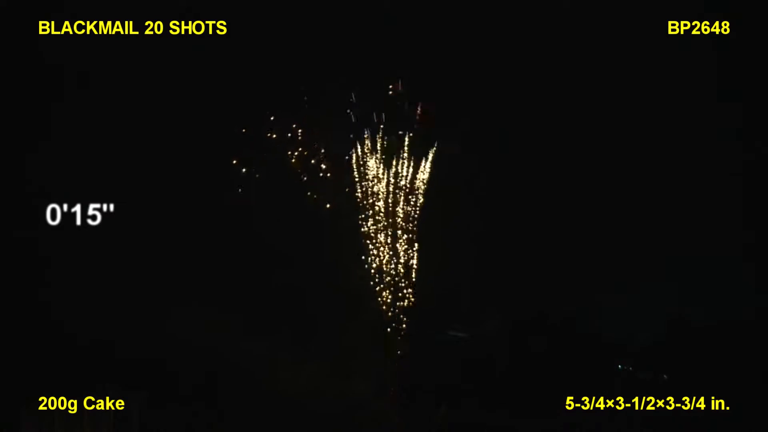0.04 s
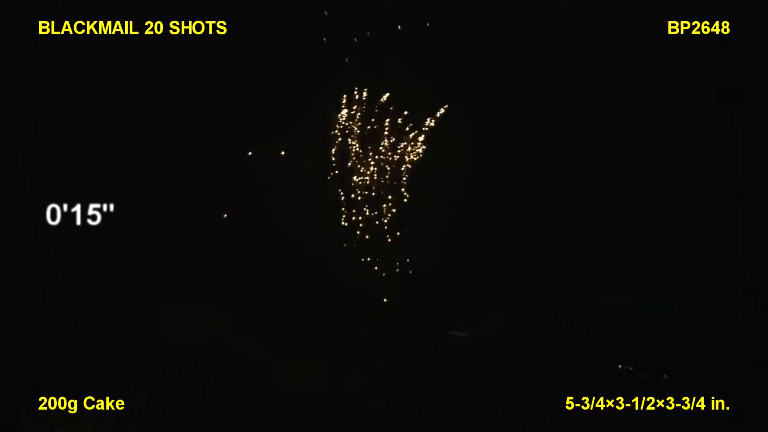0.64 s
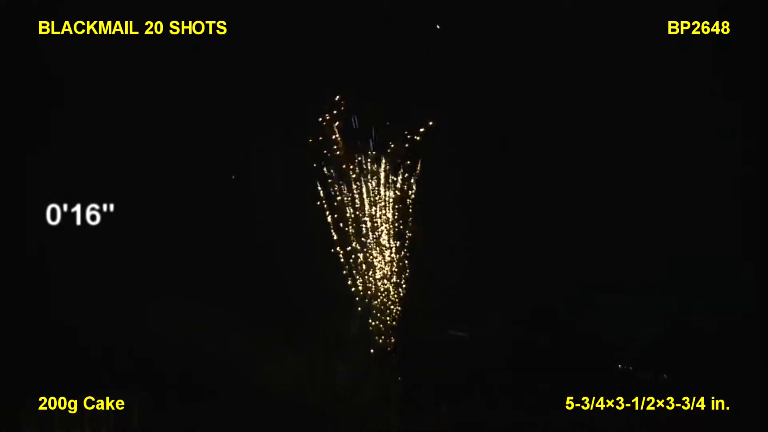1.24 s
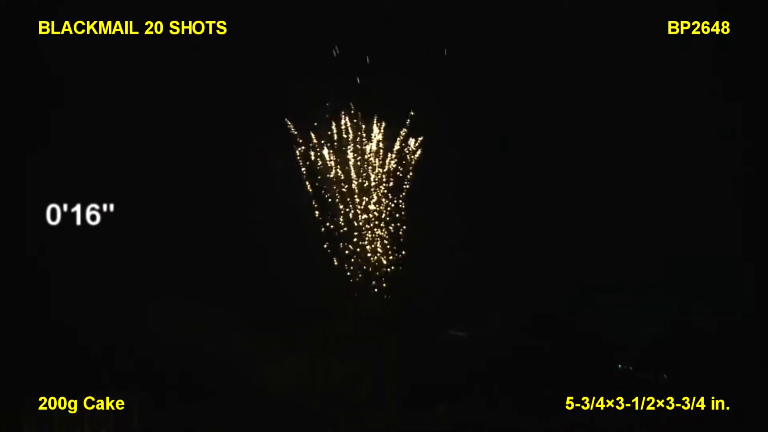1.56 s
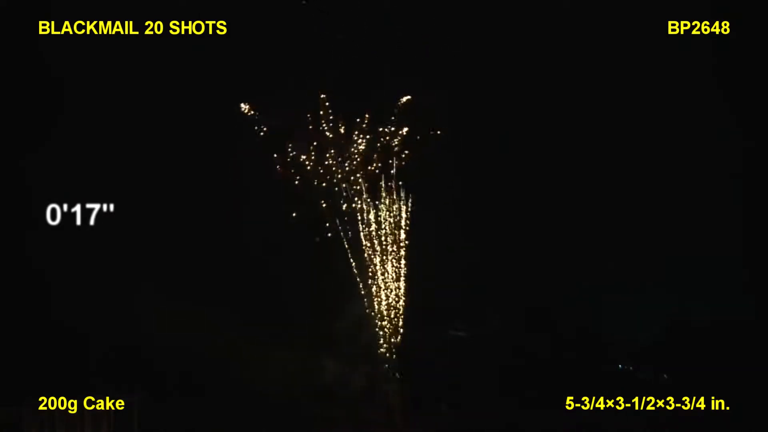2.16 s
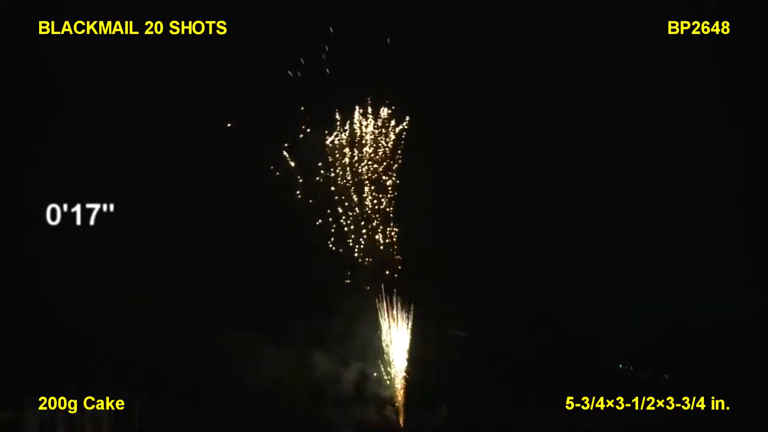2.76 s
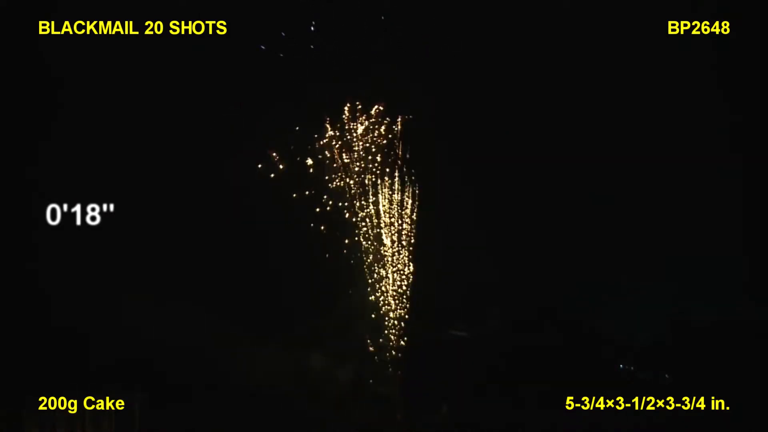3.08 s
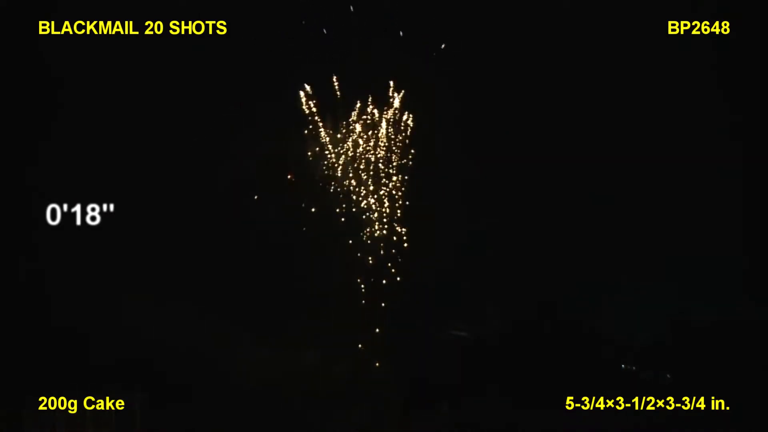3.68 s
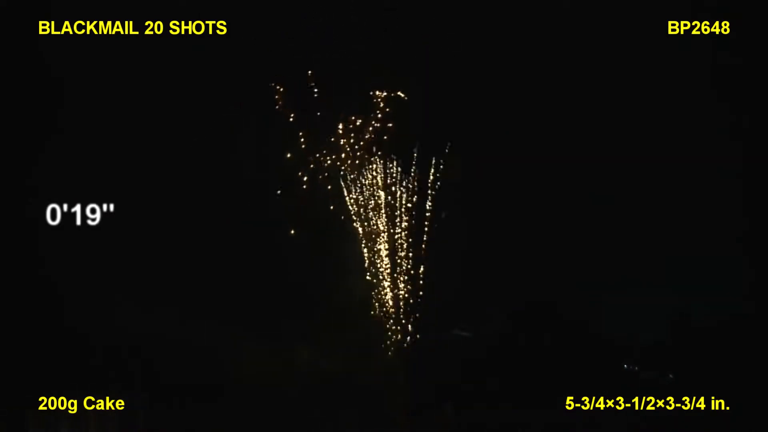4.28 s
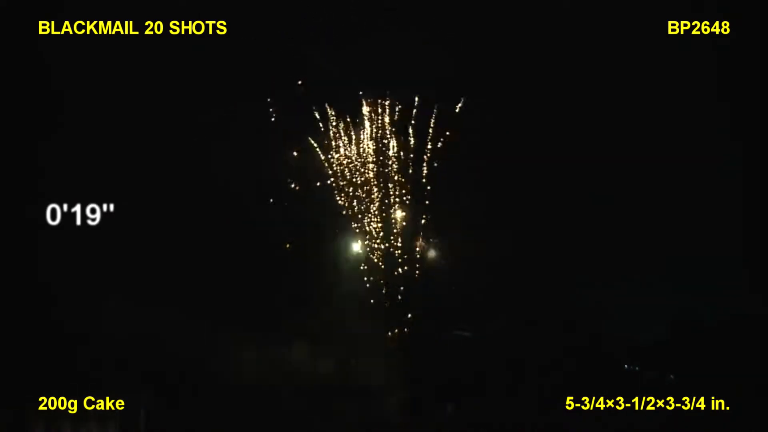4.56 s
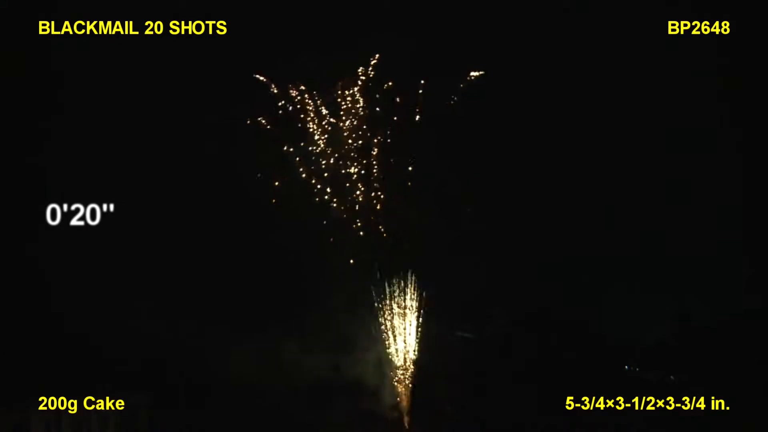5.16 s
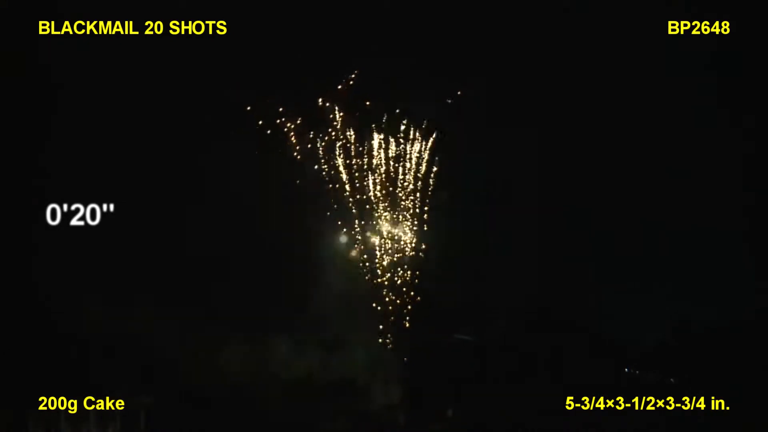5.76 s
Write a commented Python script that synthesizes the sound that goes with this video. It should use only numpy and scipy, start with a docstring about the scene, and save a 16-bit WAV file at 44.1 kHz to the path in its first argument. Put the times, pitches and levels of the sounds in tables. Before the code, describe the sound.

Echoing firework launches send up sputtering, fading hisses in an open field at night, and stars crackle sharply overhead late on.

```python
"""Burning stars rush upward and slow over singing insects: a firework cake in an open field at night.
About once a second a lift charge throws a new fan, with a thump and a spit of gas that come back as
fixed echoes and scatter from the trees. Late in the scene, stars crackle overhead.
Two microphones stand far apart: the fireworks reach the left one some 30 ms later, with other echoes
and another colour."""
import sys
import numpy as np
from scipy import signal
from scipy.fft import rfft, irfft
from scipy.io import wavfile

SR = 44100
rng = np.random.default_rng(int(sys.argv[2]) if len(sys.argv) > 2 else 0)


def dump(signal):
    """Clip the signal to [-1, 1] and save it as 16-bit WAV at the path in sys.argv[1]."""
    limited = np.clip(np.atleast_2d(signal).T, -1, 1)
    pcm = np.round(limited * 32767).astype(np.int16)
    wavfile.write(sys.argv[1], SR, pcm)


N = 265482
LEFT_LAG_S, SKY_LAG_S = .0305, .0295   # the left microphone's delay: for the cake, for the crackle


def from_db(db):
    """Decibels to gain."""
    return 10 ** (np.asarray(db) / 20)


def rms_one(x):
    """Scales x to an rms of 1."""
    return x / np.sqrt(np.mean(x ** 2) + 1e-20)


def add(out, x, start_s):
    """Mixes x into out from start_s on."""
    at = int(round(start_s * SR))
    first, last = max(at, 0), min(at + len(x), len(out))
    if last > first:
        out[first:last] += x[first - at:last - at]


def butter(x, hz, kind, order=2):
    """A plain low-, high- or band-pass."""
    return signal.sosfilt(signal.butter(order, hz, kind, fs=SR, output="sos"), x)


def resonance(x, hz, width_hz):
    """Two-pole resonance, gain 1 at its peak."""
    r = np.exp(-np.pi * width_hz / SR)
    feedback = [1, -2 * r * np.cos(2 * np.pi * hz / SR), r * r]
    return signal.lfilter(np.array([1, 0, -1]) * (1 - r * r) / 2, feedback, x)


def narrow_band(x, hz, width_hz):
    """Two resonances in series give noise a pitch; rms 1."""
    return rms_one(resonance(resonance(x, hz, width_hz), hz, width_hz))


def bell(x, hz, db, width_octaves):
    """Bell EQ: lifts or hollows out one band."""
    a, w = from_db(db / 2), 2 * np.pi * hz / SR
    k = np.sin(w) * np.sinh(np.log(2) / 2 * width_octaves)
    middle = -2 * np.cos(w)
    return signal.lfilter([1 + k * a, middle, 1 - k * a], [1 + k / a, middle, 1 - k / a], x)


def impulse(colour, size=2048):
    """The tightest causal click that has this EQ curve."""
    hz, db = np.transpose(colour)
    grid = np.maximum(np.fft.rfftfreq(size, 1 / SR), 1)
    gain = from_db(np.interp(np.log(grid), np.log(hz), db))
    cepstrum = irfft(np.log(gain))
    cepstrum[1:size // 2] *= 2
    cepstrum[size // 2 + 1:] = 0
    return irfft(np.exp(rfft(cepstrum)))


def coloured(x, colour):
    """Plays x through an EQ curve."""
    return signal.fftconvolve(x, impulse(colour))[:len(x)]


def hump(t, peak, width):
    """A bell-shaped envelope, peak 1."""
    return np.exp(-((t - peak) / width) ** 2 / 2)


def bloom(t, peak_s, octaves):
    """A hump on a logarithmic time axis: quick attack, long tail."""
    return hump(np.log2(np.maximum(t, 1 / SR) / peak_s), 0, octaves)


def ticks(t, per_s, spread_db):
    """Clicks at random moments, many weak and a few strong; rms 1."""
    signs = rng.choice([-1, 1], len(t))
    sizes = from_db(spread_db * np.minimum(rng.exponential(1, len(t)), 3))
    return rms_one((rng.random(len(t)) < per_s / SR) * signs * sizes)


# EQ of the tiny snaps as sparks break off a star: freq_hz, level_db
SPARK_EQ = [(300, -21), (1100, -5.5), (2400, 1.5), (3600, 5.5), (5000, -15.5), (14000, -31)]
def rush(t, stars=8, start_hz=3367, sag_hz_per_s=1900, spread_octaves=.55, sputter_db=4, tumble_db=4):
    """Each burning star hisses in a band that sinks as it slows; it sputters, tumbles and sheds sparks."""
    hisses = 0
    for place in np.linspace(-1, 1, stars):
        detune = 2 ** (spread_octaves * place + .06 * rng.standard_normal())
        pitch_hz = (start_hz - sag_hz_per_s * t) * detune
        white = rng.standard_normal((3, len(t)))
        hiss = butter(white[0] + 1j * white[1], 150, "low") * np.exp(2j * np.pi * np.cumsum(pitch_hz) / SR)
        tumble_hz = 42 * 2 ** rng.uniform(-.512, .488)
        tumble = np.sin(2 * np.pi * (tumble_hz * t + rng.random()))
        sputter = rms_one(butter(white[2], 20.5, "low"))
        hisses += rms_one(hiss.real) * from_db(sputter_db * sputter + tumble_db * tumble - 5.8 * place ** 2)
    sparks = rms_one(coloured(ticks(t, per_s=130, spread_db=3.5), SPARK_EQ))
    # the fan flares up, fades gently while it slows, then burns out
    ignition_s, burn_s, fade_db_per_s, burnout_db_per_s = .075, .55, 10, 79
    flare_db = 8.5 * bloom(t, peak_s=.071, octaves=.54)
    level_db = -8 + flare_db - fade_db_per_s * t - burnout_db_per_s * np.maximum(t - burn_s, 0)
    envelope = from_db(level_db) * np.minimum(t / ignition_s, 1)
    return envelope * rms_one(rms_one(hisses) + from_db(-7) * sparks)


def roar(t):
    """The low flutter of the flames, which grows as the stars near the top of their climb."""
    flames = narrow_band(rng.standard_normal(len(t)), hz=760, width_hz=330)
    return hump(t, peak=.47, width=.13) * flames


# EQ of the ignition hiss: freq_hz, level_db
SPRAY_EQ = [(500, -4), (1400, 13), (2500, 0), (4000, 9.5), (5500, -13), (9000, -4), (14500, -12),
            (16000, -24)]
def spray(t):
    """The bright hiss of the whole fan catching fire just above the tube."""
    hiss = rms_one(coloured(rng.standard_normal(len(t)), SPRAY_EQ))
    return bloom(t, peak_s=.074, octaves=.72) * hiss


# EQ of the finest sparks: freq_hz, level_db
FIZZ_EQ = [(1500, -27), (4000, 7.5), (6000, -0.5), (9000, -3), (15000, -23)]
def fizz(t):
    """The finest sparks of the tails: a bright, grainy hiss that peaks early in the climb."""
    grains = rms_one(coloured(ticks(t, per_s=2500, spread_db=.5), FIZZ_EQ))
    return bloom(t, peak_s=.17, octaves=1) * grains


def last_star(t, turns_per_s, start_hz=2450, sag_hz_per_s=700, upper_ratio=1.57, peak_s=.565):
    """The last star to burn out tumbles and puffs once a turn, in two bands that sink as it slows."""
    puffs = .15 + np.cos(np.pi * turns_per_s * (t - peak_s)) ** 10
    phase = 2 * np.pi * np.cumsum(start_hz - sag_hz_per_s * t) / SR
    white = rng.standard_normal((2, 2, len(t)))
    lower, upper = butter((white[0] + 1j * white[1]) * puffs, 130, "low")
    hiss = lower * np.exp(1j * phase) + from_db(-6) * upper * np.exp(1j * upper_ratio * phase)
    return rms_one(hiss.real) * hump(t, peak_s, width=.034)


# Cue sheet of the cake, one shot a row; levels are trims on each layer's own gain.
# Played by launches(): start_s, thump_db, knock_db, jet_left_db, jet_right_db, jet_treble_db,
#   ring_hz, ring_db, second_ring_hz, second_ring_db, tube_left_db, tube_right_db,
#   notch_left_hz, notch_right_hz, upper_notch_hz
# Then, for flights(): rush_db, spray_db, fizz_db, last_star_db, turns_per_s
SHOTS = [(-.263, -11, 5.5, -20.5, -26, 5.5, 2730, 10, 1180, 10, -10, 4, 1560, 1780, 2470, 2, 4, -4, 0, 45),
         (1.0374, -10.5, 1.5, -20.5, -25.5, -6, 2264, 13.5, 4670, 8.5, 0.5, 5, 1020, 1870, 3700, 4, 4, 1.5, -13, 39),
         (2.0926, -11.5, 6, -23, -28, 0.5, 2660, 12.5, 1560, 3, 8, -2.5, 1130, 2080, 4200, 1.5, -1.5, 2, -8, 36),
         (2.9788, -9, 5, -22.5, -26.5, 4.5, 2620, 9, 4640, 14, 7, 2.5, 1370, 1390, 4340, 6, -2, 4.5, -1, 33),
         (4.1522, -9.5, 6, -23, -23.5, -4, 2520, 4.5, 3400, 0, -0.5, -0.5, 1146, 2020, 2810, 4, 3, 1.5, 3, 54),
         (5.328, -11, 9.5, -24.5, -26, -3, 2120, 5.5, 3300, -1, 0.5, 1, 1200, 2290, 2830, 5.5, 1, -1, -0.5, 73)]
def flights():
    """Every fan of stars climbs and burns out; the first is already in the air as the scene opens."""
    t, out = np.arange(int(.9 * SR)) / SR, np.zeros((2, N))
    rush_gain, spray_gain = from_db([-51, -60.5]), from_db([-55, -61.5])   # left, right
    fizz_gain, last_gain = from_db([-73, -68]), from_db([-58, -73])
    for start_s, *_, rush_db, spray_db, fizz_db, last_db, turns_per_s in SHOTS:
        for side, lag_s in enumerate((LEFT_LAG_S, 0)):
            fan = rush_gain[side] * from_db(rush_db) * (rush(t) + from_db(-17) * roar(t))
            fan += spray_gain[side] * from_db(spray_db) * spray(t)
            fan += fizz_gain[side] * from_db(fizz_db) * fizz(t)
            fan += last_gain[side] * from_db(last_db) * last_star(t, turns_per_s)
            add(out[side], fan, start_s + lag_s)
    return out


# EQ of the night air on each side: freq_hz, level_db
AIR_EQ_LEFT = [(20, -8), (80, 3), (170, -9.5), (350, -17.5), (800, -19), (1250, -19.5), (1800, -28),
               (3500, -26), (6000, -39), (7500, -33), (12500, -26.5), (16000, -64)]
AIR_EQ_RIGHT = [(20, -3), (80, -0.5), (170, -0.5), (350, -12), (800, -17.5), (1250, -18.5), (1800, -25),
                (3800, -24.5), (5800, -27), (8000, -24), (12500, -28), (16000, -34)]
# Fader ride on the katydid's song: time_s, trim_db
KATYDID_RIDE = [(0, -2.5), (1.8, -4), (3.1, 0.5), (4.2, -2), (6, -7)]
def night(strokes_hz=210.74):
    """The bed: distant rumble and air, crickets, a katydid's buzzing wing strokes and a far insect."""
    t, white = np.arange(N) / SR, rng.standard_normal((7, N))
    air = np.array([rms_one(coloured(white[0], AIR_EQ_LEFT)), rms_one(coloured(white[1], AIR_EQ_RIGHT))])
    crickets = np.array([narrow_band(noise, hz=3100, width_hz=180) for noise in white[2:4]])
    strokes = np.cumsum(strokes_hz + 1.2 * rms_one(butter(white[4], 6, "low"))) / SR
    buzz = rms_one(sum(np.cos(2 * np.pi * harmonic * strokes) for harmonic in range(46, 61)))
    rasp = buzz * (1 + .3 * white[5])
    katydid = rms_one(resonance(rasp, hz=10380, width_hz=800))
    katydid *= from_db(np.interp(t, *np.transpose(KATYDID_RIDE)))
    far_insect = narrow_band(white[6], hz=9150, width_hz=500)
    far_insect *= from_db(np.interp(t, [1.9, 2.1], [-1, -11]))
    return (air * from_db([[-60.5], [-69.5]]) + crickets * from_db([[-70], [-89]])
            + katydid * from_db([[-69], [-87]]) + far_insect * from_db([[-90], [-78]]))


def tree_scatter(level_db, ground_db, colour, onset_s, far_edge_s, edge_s):
    """The ground answers a click at once; branches and leaves follow with a fading wash of ticks."""
    t = np.arange(int(1.2 * SR)) / SR
    fall_db_per_s, late_db_per_s, ground_db_per_s, air_db_per_s = 14, 22.5, 902, 24
    # the wash drops once the far edge of the field has answered
    late_s = np.maximum(t - far_edge_s, 0)
    fade_db = fall_db_per_s * t + 1.5 * np.minimum(late_s / edge_s, 1) + late_db_per_s * late_s
    clumps_db = rms_one(butter(rng.standard_normal(len(t)), 89.5, "low"))   # trees stand in clumps
    envelope = np.minimum(t / onset_s, 1) * from_db(level_db - fade_db + clumps_db)
    ground = from_db(ground_db - ground_db_per_s * t) * butter(rng.standard_normal(len(t)), 306, "high")
    trees = envelope * ticks(t, per_s=1100, spread_db=4.5)
    wash = coloured(trees + ground, colour) / np.sqrt(SR)
    # longer paths lose their top to the air
    lost_top = butter(wash, 4570, "high", order=1) * (1 - from_db(-air_db_per_s * t))
    return wash - lost_top


# The clear echoes of the field on each side: delay_s, level_db, treble_re_bass_db
ECHOES_LEFT = [(0.0368, -16.5, -2), (0.0922, -11, -5), (0.1715, -11.5, -1.5), (0.2084, -16, -4.5),
               (0.2674, -22.5, -5), (0.3012, -24.5, -6), (0.4848, -21, -21), (0.5584, -24.5, -5)]
ECHOES_RIGHT = [(0.0684, -18, 2), (0.1168, -19, 7), (0.1545, -20, -13), (0.2295, -28, -17),
                (0.4608, -42, -17), (0.4806, -28, -6)]
# EQ of the wash from trees and ground on each side: freq_hz, level_db
WASH_EQ_LEFT = [(40, 5.5), (150, -0.5), (450, -4.5), (850, -1.5), (1300, 6.5), (3000, -6), (6000, 2),
                (10000, -2.5), (16000, 7)]
WASH_EQ_RIGHT = [(40, -6.5), (150, -3), (450, 0.5), (800, 7.5), (1300, 12), (3000, 5.5), (6000, 12),
                 (10000, 6), (16000, -16)]
def field(echoes, colour, wash_db, ground_db, trunk_db, bass_hz, slap_hz, trunks=12):
    """The field's answer to one click: separate echoes, each a round bass and a slap, in a wash."""
    onset_s, far_edge_s, edge_s = .04, .47, .19
    out = tree_scatter(wash_db, ground_db, colour, onset_s, far_edge_s, edge_s)
    # single trunks at random distances add weak, dull echoes
    places = (np.arange(trunks) + rng.random(trunks)) / trunks
    delays_s = onset_s + (far_edge_s + edge_s / 2 - onset_s) * places
    trunk_echoes = [(delay_s, trunk_db - 14 * delay_s, -14) for delay_s in delays_s]
    t = np.arange(4096) / SR
    bass = butter(signal.unit_impulse(len(t)), bass_hz, "low")
    for delay_s, level_db, treble_db in list(echoes) + trunk_echoes:
        # farther reflectors are broad and leafy: they smear the treble
        smear = rng.standard_normal(len(t)) * np.exp(-t / (.03 * delay_s ** 3))
        slap = butter(smear / np.sqrt(np.sum(smear ** 2)), slap_hz, "band", order=1)
        add(out, from_db(level_db) * (bass + from_db(treble_db) * slap), delay_s)
    return out


# Rising stars that spit once, as heard on the left: start_s, peak_db, pitch_hz
SPITS = [(.0755, -37.5, 2720), (.156, -46, 3700), (.254, -47, 700)]
def spits(decay_s=.0012, half_width_octaves=.14, right_db=-13):
    """A pocket of gas bursts in a star: one short puff with a pitch of its own."""
    t, out = np.arange(int(.02 * SR)) / SR, np.zeros((2, N))
    edge = 2 ** half_width_octaves
    for start_s, peak_db, pitch_hz in SPITS:
        gas = rng.standard_normal(len(t)) * t * np.exp(-t / decay_s)
        puff = butter(gas, [pitch_hz / edge, pitch_hz * edge], "band")
        puff = from_db(peak_db) * puff / np.abs(puff).max()
        add(out[0], puff, start_s)
        add(out[1], from_db(right_db) * puff, start_s - LEFT_LAG_S)
    return out


def thump(t, swell_s, release_s, rebound):
    """Gas leaves a tube: a negative lobe as the flow swells, an opposite one as it dies."""
    swell = np.sin(np.pi * np.clip(t / swell_s, 0, 1))
    release = np.maximum(t - swell_s, 0) / release_s
    return rebound * release * np.exp(1 - release) - .5 * swell


def jet(t, colour, treble_db, bands):
    """A spit of turbulent gas, heard with rings and notches: centre_hz, gain_db, width_octaves."""
    blow = hump(t, peak=.0018, width=.00074) + .22 * np.exp(-t / .0075)
    eddies = rfft(rng.standard_normal(len(t)) * blow)
    # eddies of every size share the energy almost evenly
    gas = irfft(eddies / np.abs(eddies) ** .9, len(t)) * np.exp(-t / .008)
    gas += (from_db(treble_db) - 1) * butter(gas, 4000, "high", order=1)
    gas = coloured(gas, colour)
    for band in bands:
        gas = bell(gas, *band)
    return gas / np.sqrt(np.sum(gas ** 2) / (.002 * SR))   # the energy of 2 ms at rms 1


# EQ of the gas jet on each side: freq_hz, level_db
JET_EQ_LEFT = [(100, -40), (500, -7), (800, -1.5), (1150, -6.5), (1500, -3), (2150, -5), (3400, -0.5),
               (4300, -12), (5200, -23.5), (6200, -19.5), (10000, -18), (16000, -33)]
JET_EQ_RIGHT = [(40, 2), (150, 10), (450, -1.5), (700, 6.5), (1200, -5), (1700, -5.5), (2600, -3.5),
                (3700, 1.5), (5000, -11), (9000, -18), (12000, -22.5), (16000, -45)]
def launches(usual_thump_db=-9.5, halving_db=6.5, ring_octaves=.28, notch_octaves=.23):
    """Lift charges as (start_s, left, right): a round thump left, a tight knock right, a ringing jet."""
    t, shots = np.arange(int(.05 * SR)) / SR, []
    for (start_s, thump_db, knock_db, jet_left_db, jet_right_db, treble_db,
         ring_hz, ring_db, second_hz, second_db, tube_left_db, tube_right_db,
         notch_left_hz, notch_right_hz, upper_notch_hz, *_) in SHOTS:
        body = thump(t, swell_s=.0032, release_s=.0013, rebound=.34)
        body = butter(butter(body, 900, "low"), 55, "high", order=1)
        # a stronger charge empties its tube faster, which shortens the knock
        pace = 2 ** ((thump_db - usual_thump_db) / halving_db)
        knock = thump(t * pace, swell_s=.00225, release_s=.0008, rebound=.46)
        knock = butter(butter(knock, 1400, "low"), 70, "high")
        knock = bell(knock, hz=405, db=knock_db, width_octaves=.42)
        # each shot rings in three bands on the left and two on the right, with two notches on each side
        upper_notch = (upper_notch_hz, -11.5, .074)
        left_bands = [(ring_hz, ring_db, ring_octaves), (second_hz, second_db, ring_octaves),
                      (850, tube_left_db, ring_octaves), (notch_left_hz, -9.5, notch_octaves)]
        right_bands = [(ring_hz, 9.5, ring_octaves), (645, tube_right_db, ring_octaves),
                       (notch_right_hz, -15.5, notch_octaves)]
        left = from_db(jet_left_db) * jet(t, JET_EQ_LEFT, treble_db, left_bands + [upper_notch])
        right = from_db(jet_right_db) * jet(t, JET_EQ_RIGHT, treble_db, right_bands + [upper_notch])
        left += from_db(thump_db - 1.1) * body
        right += from_db(thump_db - .85) * knock
        shots.append((start_s, left, right))
    return shots


def pop(click, cutoff_hz, bounce_s, bounce_gain=.54):
    """One crack: a sharp shock, duller at a low cutoff, and its bounce off the ground; peak 1."""
    shock = -butter(click, cutoff_hz, "low", order=1)
    out = shock.copy()
    add(out, bounce_gain * shock, bounce_s)
    return out / np.abs(out).max()


# Sharp cracks overhead, and two faint echoes of the first pair, timed on the right:
# start_s, level_db, left_trim_db, extra_left_lag_s
CRACKS = [(4.5242, -21, -4, 0.00077), (4.542, -18, -4, 0.00062), (4.636, -33, -12.0, 0.0001),
          (4.6547, -31.5, -8, -0.0029), (4.7672, -32, -7, -0.0036), (4.8604, -16, -7.5, 0.0016),
          (4.8661, -19, -7, 0.0023), (4.8795, -18.5, -10, -0.00027), (4.8824, -13.5, -9, 0.0001),
          (4.8934, -20.5, -4.5, -0.0009), (4.907, -17, -6, 0.001), (4.9173, -14, -9, 0.0017),
          (4.9284, -16, -14, 0.0008), (4.9305, -20, -1.5, -0.0013), (4.9427, -18.5, -7, 0.0003),
          (4.9449, -16, -10, 0.0012), (4.9463, -20.5, -6, -0.0006), (4.9538, -18, -10, -0.0034),
          (4.9563, -16.5, -6.5, -0.0003), (4.9618, -13.5, -8.5, 0.0004), (4.9665, -13.0, -5.5, 0.001),
          (4.9683, -16.5, -3, -0.0007), (4.9713, -18.5, -4, 0.0043), (4.9745, -18, -2, -0.0006),
          (4.9797, -13, -11, -0.0004), (4.982, -19.5, -4, 0.0009), (4.9903, -15.0, -10, 0.0003),
          (5.0033, -19, -4, -0.0012), (5.0123, -19, -6.5, 0.0005), (5.0159, -18, -3, -0.0011),
          (5.0178, -12.5, -7, 0.0), (5.0195, -22, -4.5, -0.0012), (5.022, -18, -7.0, -0.0007),
          (5.0374, -18, -7.0, -0.0051), (5.0397, -16.0, -8.0, 0.0002), (5.0426, -15, -9, 0.0006),
          (5.0492, -17.5, -5, 0.0009), (5.0536, -17, -6.5, 0.0), (5.0582, -13.5, -8.5, 0.0005),
          (5.065, -19, -6, 0.0003), (5.0837, -17.5, -7.5, 0.0005), (5.09, -19, -11, -0.0005),
          (5.0985, -15, -9.5, -0.0011), (5.1012, -16, -5.5, 0.000064), (5.1244, -28.5, -2, -0.0029),
          (5.1731, -14, -6.0, 0.0023), (5.1994, -16, -1.5, 0.0013), (5.2551, -19, -3, -0.0017),
          (5.258, -18, -10, 0.00091), (5.6916, -19.0, -5.5, 0.001), (5.71, -32, -6, -0.0024),
          (5.7143, -28.5, -7, -0.0028)]
# EQ of a crack on each side: freq_hz, level_db
CRACK_EQ_LEFT = [(40, -15), (150, -6.5), (300, -10.5), (550, 4), (900, 1), (1300, -5), (1750, -3.5),
                 (2100, 5), (3400, 1), (4000, -7), (5200, -14.5), (8500, -14.5), (12000, -15.5),
                 (15500, -35)]
CRACK_EQ_RIGHT = [(40, -38), (150, -10), (300, -0.5), (520, 5), (900, -1), (1400, -18), (2000, -8),
                  (3200, -3.5), (3850, 2.5), (4500, -7.5), (8500, -10), (12000, -17), (15500, -33)]
def crackle():
    """Sharp cracks of stars overhead and two faint echoes, each with its own lag between the sides."""
    left_click, right_click = impulse(CRACK_EQ_LEFT), impulse(CRACK_EQ_RIGHT)
    out = np.zeros((2, N))
    for start_s, level_db, left_trim_db, extra_lag_s in CRACKS:
        brightness, height = rng.uniform(-.97, 1, 2)
        cutoff_hz = 11000 * 2 ** (.73 * brightness)
        bounce_s = .0008 * 2 ** (.62 * height)
        left = from_db(level_db + left_trim_db + 2.5) * pop(left_click, cutoff_hz, bounce_s)
        right = from_db(level_db + .1) * pop(right_click, cutoff_hz, bounce_s)
        add(out[0], left, start_s + SKY_LAG_S + extra_lag_s)
        add(out[1], right, start_s)
    return out


# EQ of the trees' answer to a crack: freq_hz, level_db
SKY_WASH_EQ = [(100, 6), (350, 4.5), (750, 6), (1300, 10.5), (2200, 5), (3500, 4), (6000, 4), (15000, -3)]
def sky_scatter(peak_s, fall_db_per_s, near_db):
    """A crack overhead returns as a short swish from the nearest trees and a soft swell from the rest."""
    t = np.arange(int(.9 * SR)) / SR
    swish = hump(t, peak=.075, width=.0089) * butter(rng.standard_normal(len(t)), [1900, 4600], "band")
    swell = np.minimum(t / peak_s, 1) * from_db(-fall_db_per_s * np.maximum(t - peak_s, 0))
    wash = coloured(ticks(t, per_s=2500, spread_db=3.5), SKY_WASH_EQ)
    return (swell * wash + from_db(near_db) * swish) / np.sqrt(SR)


def scene():
    """The mix: flights, night and spits stay dry; shots and cracks also return from the field."""
    fields = (field(ECHOES_LEFT, WASH_EQ_LEFT, wash_db=-2.5, ground_db=11, trunk_db=-20,
                    bass_hz=346, slap_hz=[1200, 5000]),
              field(ECHOES_RIGHT, WASH_EQ_RIGHT, wash_db=-10, ground_db=2, trunk_db=-33,
                    bass_hz=630, slap_hz=[600, 6000]))
    sky = (sky_scatter(peak_s=.055, fall_db_per_s=40, near_db=4),
           sky_scatter(peak_s=.06, fall_db_per_s=42, near_db=12))
    out = night() + flights() + spits()
    cracks, shots = crackle(), launches()
    shot_send, crack_send = from_db(.5), from_db([-4.8, -9])
    for side, lag_s in enumerate((LEFT_LAG_S, 0)):
        for start_s, *waves in shots:
            add(out[side], waves[side], start_s + lag_s)
            add(out[side], shot_send * signal.fftconvolve(waves[side], fields[side]), start_s + lag_s)
        out[side] += cracks[side]
        add(out[side], crack_send[side] * signal.fftconvolve(cracks[side], sky[side]), 0)
    # one hard surface throws the cracks back to the right microphone
    add(out[1], from_db(-20.5) * butter(cracks[1], 7700, "low", order=1), start_s=.1125)
    return out


def record(dry, cutoff_hz=16400):
    """A steep low-pass takes off the very top."""
    return signal.sosfilt(signal.ellip(10, .1, 80, cutoff_hz, fs=SR, output="sos"), dry)


dry = scene()
out = record(dry)
dump(out)
```